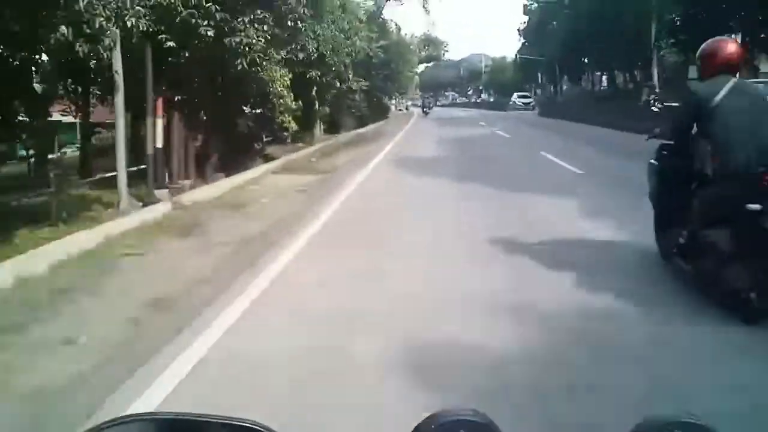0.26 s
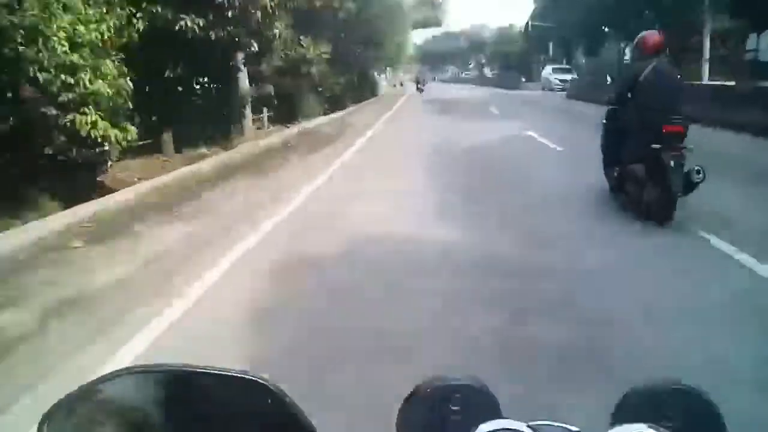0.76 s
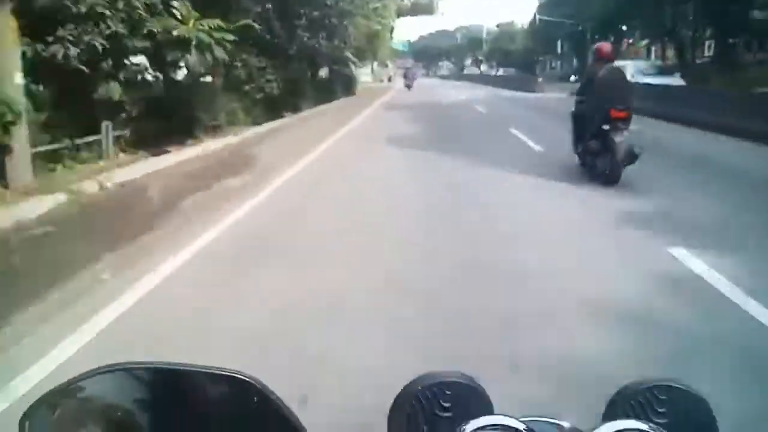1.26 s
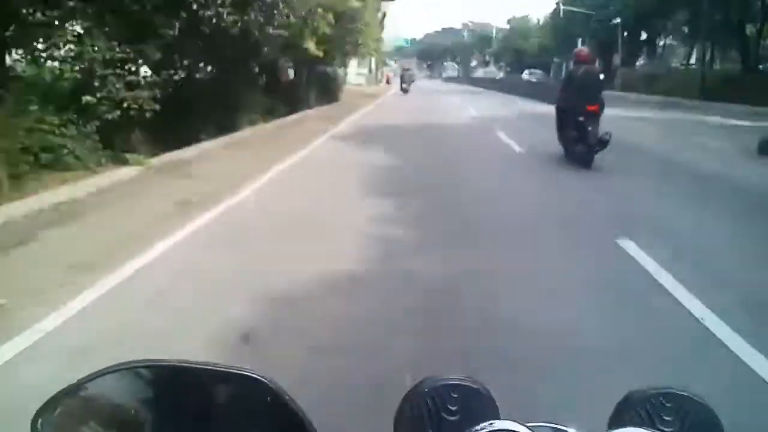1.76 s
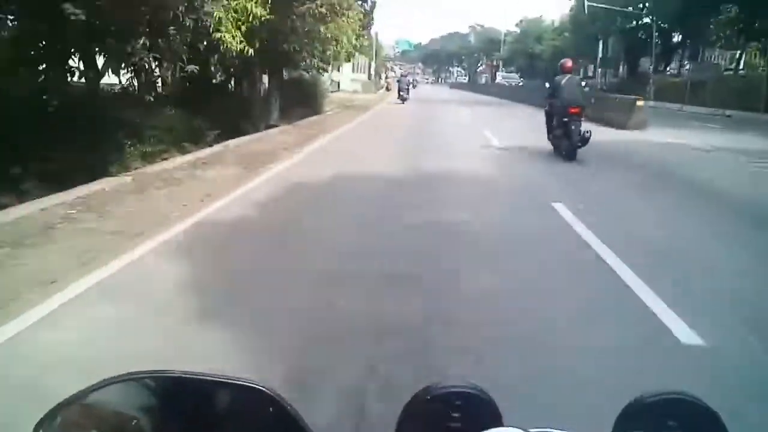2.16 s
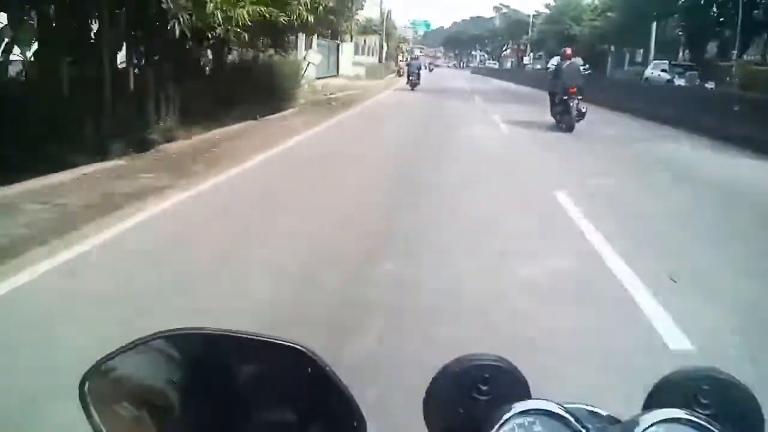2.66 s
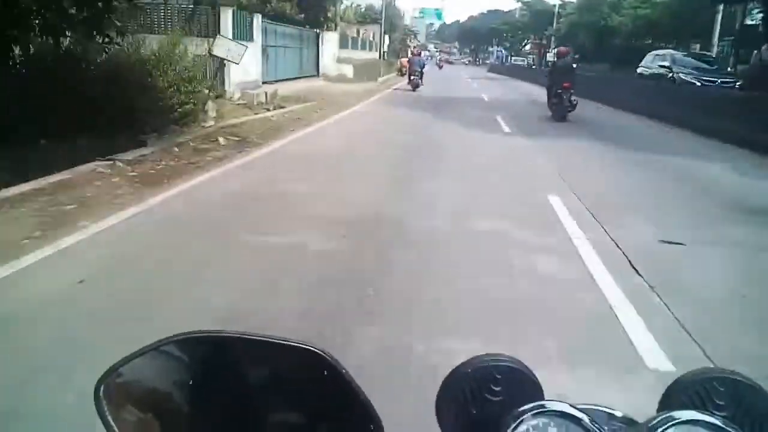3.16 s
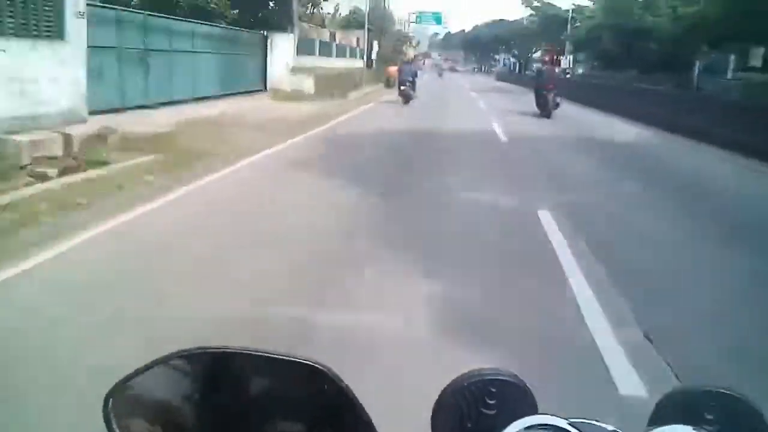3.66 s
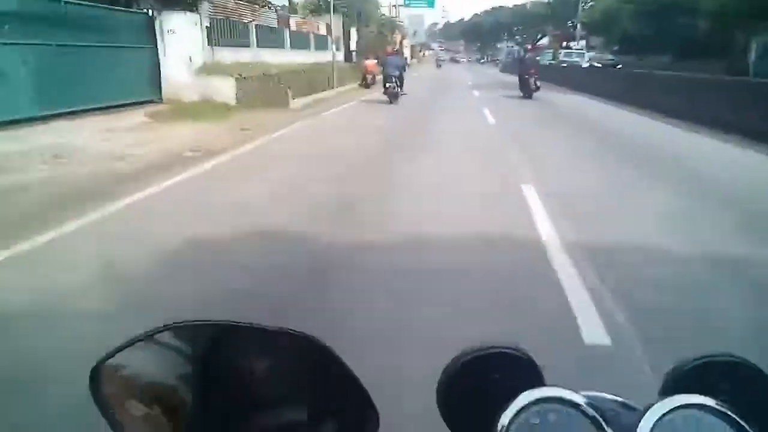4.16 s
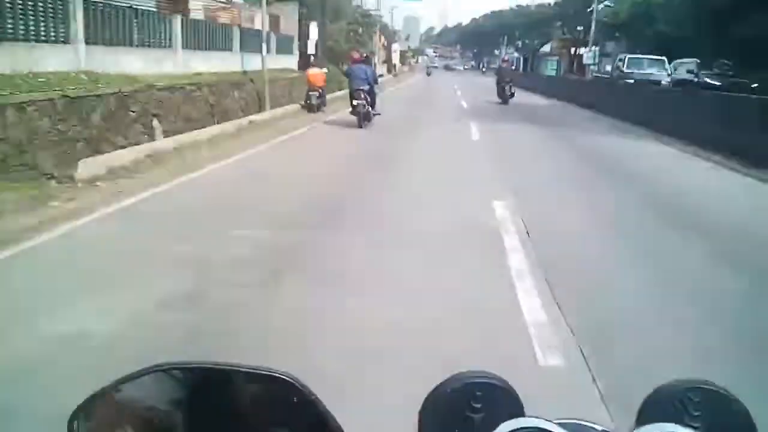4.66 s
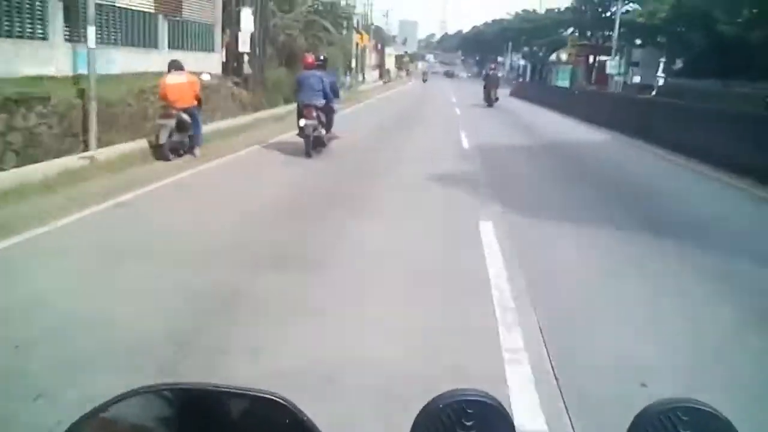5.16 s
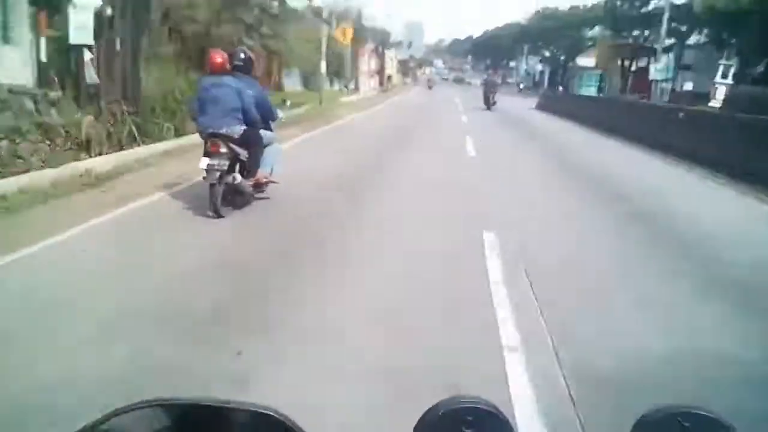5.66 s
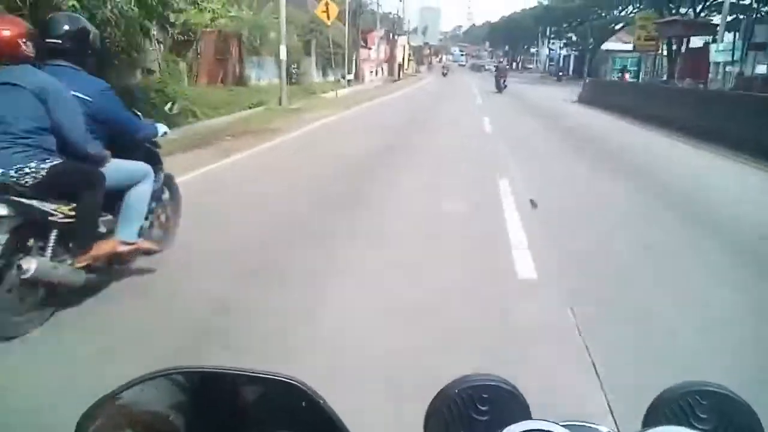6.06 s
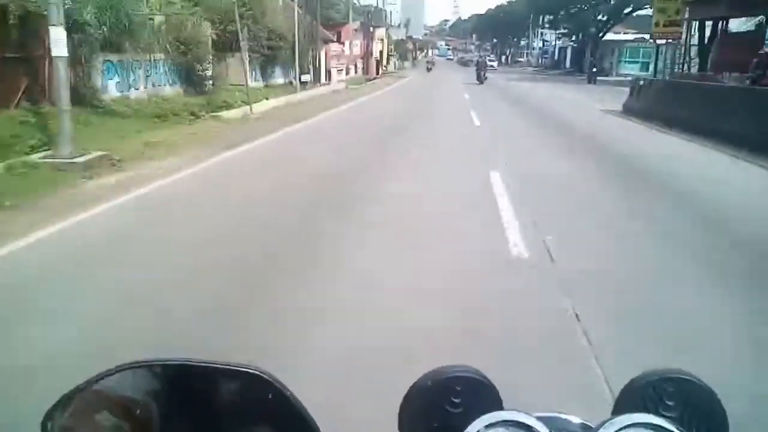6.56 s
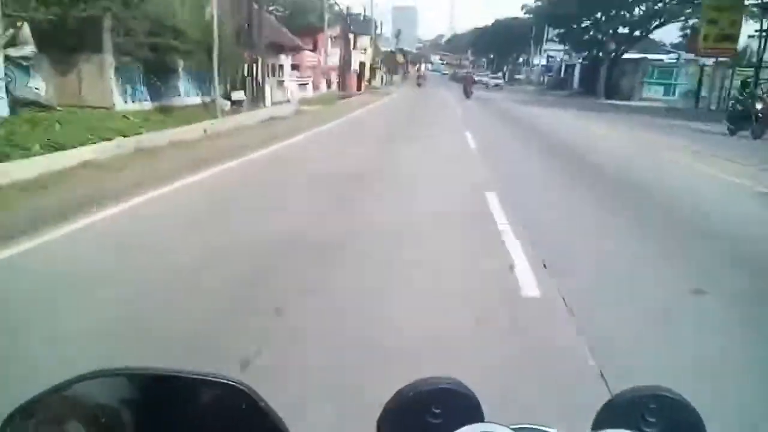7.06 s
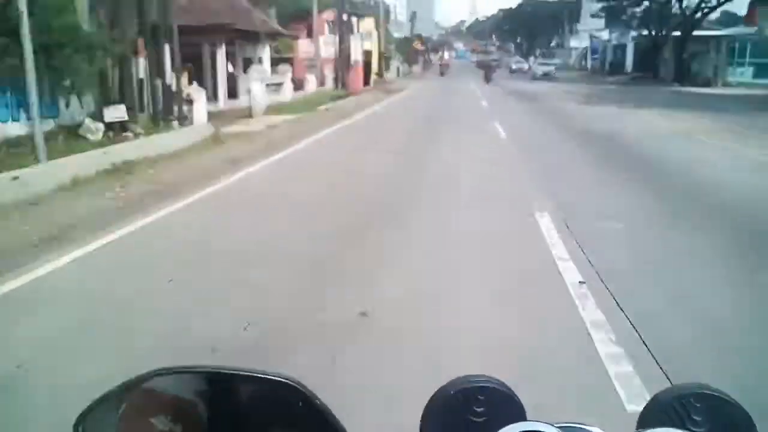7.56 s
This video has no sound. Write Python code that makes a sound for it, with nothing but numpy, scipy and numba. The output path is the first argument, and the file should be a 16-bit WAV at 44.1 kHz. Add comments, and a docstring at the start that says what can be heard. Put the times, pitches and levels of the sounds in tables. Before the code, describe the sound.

Rough, lumpy wind noise with short thumps and hiss dominates a motorcycle ride, the engine humming low and nearly constant beneath it.

```python
"""On a concrete road, a motorcycle cruises with a camera aboard, heard through the camera's muffled microphone.
Turbulent air is shaped noise: a low rumble with gusts and gaps, finer rush and hiss, and short buffets.
Underneath, a single-cylinder engine drones in harmonics and clatters in resonances at nearly steady revs.
The housing ticks now and then and dry specks crackle; a limiter ducks the highest peaks over faint hiss."""
import sys
import numpy as np
from scipy import signal
from scipy.fft import rfft, irfft, next_fast_len
from scipy.io import wavfile
from scipy.ndimage import uniform_filter1d, minimum_filter1d, map_coordinates
from numba import njit

SR = 44100
rng = np.random.default_rng(int(sys.argv[2]) if len(sys.argv) > 2 else 0)


def to_wav(sig):
    """Store sig (one row per channel, or 1-D mono) as 16-bit WAV at the path in sys.argv[1].

    Samples outside -1..1 are clipped; the rate is SR.
    """
    pcm = np.clip(np.atleast_2d(sig), -1, 1) * 32767
    pcm = np.round(pcm).astype(np.int16)
    wavfile.write(sys.argv[1], SR, pcm.T)  # frames by channels


N = 343539


def undb(db):
    """Logarithmic level: decibels become an amplitude ratio."""
    return 10 ** (np.asarray(db) / 20)


def unit(x):
    """Normalisation to an rms of 1."""
    return x / np.sqrt(np.mean(x ** 2))


def curves(table):
    """Linear interpolation: each column of a timed table gets one value per sample."""
    s, *columns = np.transpose(table)
    return [np.interp(np.arange(N) / SR, s, c) for c in columns]


def colour(x, points, size=8192):
    """Minimum-phase filtering: a folded cepstrum makes the (f/Hz, level/dB) response causal."""
    hz, db = np.transpose(points)
    grid = np.maximum(np.arange(size // 2 + 1) * SR / size, 1)
    response_db = np.interp(np.log(grid), np.log(hz), db)
    cepstrum = irfft(np.log(undb(response_db)))
    cepstrum[1:size // 2] *= 2
    cepstrum[size // 2 + 1:] = 0
    impulse_response = irfft(np.exp(rfft(cepstrum)))
    return signal.fftconvolve(x, impulse_response)[:len(x)]


def walk(hz, size=64):
    """Low-passed random fluctuation of rms 1, with a Gaussian roll-off at about hz."""
    steps = next_fast_len(N // size + 2)
    f = np.fft.rfftfreq(steps, size / SR)
    slow = irfft(rfft(rng.standard_normal(steps)) * np.exp(-(f / hz) ** 2), steps)
    return unit(np.interp(np.arange(N) / size, np.arange(steps), slow))


def even(x, span_s):
    """Envelope normalisation: the running rms is held near 1, faster flutter remains."""
    width = max(int(span_s * SR), 2)
    power = uniform_filter1d(uniform_filter1d(x ** 2, width), width)
    return x / np.sqrt(power + 1e-12)


def add(out, s, sound):
    """Superposition: mix a sound in at time s."""
    start = max(int(s * SR), 0)
    out[start:start + len(sound)] += sound[:N - start]


# headwind, large eddies: t/s, relative rumble level/dB
HEADWIND = [(0.0, -27), (0.39, -16.5), (0.56, -21), (2.39, -21.5), (2.75, -18.5), (3.36, -14.5),
            (3.54, -18), (3.95, -19), (4.62, -20.5), (5.84, -18.5), (6.4, -17.5), (6.88, -13), (7.2, -20.5),
            (7.79, -11.5)]
# headwind, small eddies: t/s, relative rush level/dB, relative hiss level/dB
FINE_TURBULENCE = [(0.0, -23.5, -25), (0.07, -20.5, -26), (0.1, -30, -34.5), (0.24, -23, -28),
                   (0.46, -22.5, -28.5), (0.6, -27.5, -33), (0.9, -27, -31), (1.28, -26, -32.5),
                   (1.55, -28, -35), (1.93, -29, -36), (2.2, -26.5, -29.5), (2.45, -28, -36),
                   (2.65, -33, -32.5), (2.8, -28.5, -37.5), (3.05, -25, -34.5), (3.3, -27, -33),
                   (3.6, -23.5, -33), (3.76, -26, -31.5), (3.95, -29, -36.5), (4.18, -24.5, -32),
                   (4.45, -27, -32.5), (4.71, -28.5, -37), (4.85, -28, -32), (5.15, -29, -36),
                   (5.38, -22, -30.5), (5.58, -28, -39), (5.75, -29.5, -34.5), (6.05, -28, -35),
                   (6.25, -25.5, -32), (6.46, -25, -30), (6.62, -27.5, -30), (6.8, -19.5, -26),
                   (6.97, -25.5, -30.5), (7.12, -22.5, -32), (7.26, -27.5, -33.5), (7.33, -24, -30),
                   (7.42, -23, -31), (7.56, -23, -29), (7.65, -26, -34), (7.79, -26, -32.5)]
# nominal size of the eddies, given as a pitch: t/s, f/Hz
EDDY_PITCH = [(0, 115.5), (1.7, 113.5), (3.1, 95.94), (4.4, 106.8), (5.3, 122.2), (6.1, 107.2),
              (7.79, 112.3)]
# spectral shapes of large, small and finest eddies: f/Hz, relative density level/dB per Hz
RUMBLE_SPECTRUM = [(20, -30), (38, -24), (50, -15), (64, -11), (80, 0.5), (100, 4.5), (130, 1), (170, -2.5),
                   (240, -8.5), (330, -14.5), (500, -32.5), (1000, -63)]
RUSH_SPECTRUM = [(100, -9), (200, -4.5), (320, 2.5), (500, -1.5), (750, -6.5), (1100, -11.5), (1600, -17.5),
                 (2600, -27.5), (4000, -45)]
HISS_SPECTRUM = [(400, -26.5), (900, -3), (1300, -1), (2000, -2), (2700, -4), (3150, -6.5), (3400, -9),
                 (4000, -16.5), (6000, -15.5)]


def airflow(rumble_db=0.5, gust_db=-1.5, rush_db=0, hiss_db=-1.0, gust_rush_db=-16, suction_db=3.0,
            lump_db=1.24, surge_db=1.4, rush_flutter_db=2.5, hiss_flutter_db=1.5, usual_eddy_hz=112,
            glide=.7, waver=.02, rush_patchy_db=2.5, hiss_patchy_db=2.7):
    """Turbulence: large eddies rumble, lower when bigger; small ones ride on them and tear loose in suction."""
    large_db, = curves(HEADWIND)
    small_db, fine_db = curves(FINE_TURBULENCE)
    eddy_hz, = curves(EDDY_PITCH)
    gust, lumps, flutter = gusts(), walk(21), walk(28)

    # reading the noise faster or slower shifts its pitch
    pace = (eddy_hz / usual_eddy_hz) ** glide * np.exp(waver * walk(14.01))
    steady_eddies = colour(rng.standard_normal(N), RUMBLE_SPECTRUM)
    eddies = map_coordinates(steady_eddies, [np.cumsum(pace)], order=3, mode="mirror")
    pressure = even(eddies, span_s=0.05)

    rush_gain = undb(rush_flutter_db * flutter - suction_db * pressure)
    rush = colour(rng.standard_normal(N) * rush_gain, RUSH_SPECTRUM)
    hiss = colour(rng.standard_normal(N) * undb(hiss_flutter_db * flutter), HISS_SPECTRUM)
    rush = even(patchy(rush, rush_patchy_db), span_s=0.036)
    hiss = even(patchy(hiss, hiss_patchy_db), span_s=0.35)

    # headwind and gusts add in power
    rumble_level = np.hypot(undb(large_db + rumble_db), gust * undb(gust_db))
    rush_level = np.hypot(undb(small_db + rush_db + surge_db * lumps), gust * undb(gust_rush_db))
    gaps = lulls()
    rumble = pressure * gaps * rumble_level * undb(lump_db * lumps)
    # the gaps cut the rumble most and the hiss least
    rush = rush * rush_level * gaps ** 0.76
    hiss = hiss * undb(fine_db + hiss_db) * gaps ** .15
    return rumble + stall() * (rush + hiss)


# gusts, timed where the edges pass half height: start t/s, length t/s, relative level/dB
GUST_EVENTS = [(0.012, 0.07, -14), (0.174, 0.028, -7.5), (0.26, 0.03, -17), (0.423, 0.14, -17),
               (0.712, 0.023, -11), (0.89, 0.087, -13), (1.225, 0.07, -15.5), (1.812, 0.043, -16),
               (2.206, 0.16, -14), (2.523, 0.54, -13.5), (2.673, 0.15, -12), (3.108, 0.33, -12),
               (3.749, 0.074, -10.5), (3.852, 0.047, -12.5), (3.936, 0.18, -13), (4.222, 0.11, -14.5),
               (4.854, 0.08, -16.5), (5.056, 0.088, -13), (5.363, 0.046, -9.5), (5.524, 0.051, -10),
               (5.601, 0.28, -12.5), (5.896, 0.077, -9.5), (6.055, 0.12, -9.5), (6.322, 0.061, -10),
               (6.633, 0.34, -24), (6.909, 0.1, -11), (7.602, 0.034, -14.5), (7.705, 0.16, -19)]


def gusts(attack_s=0.025, release_s=0.032):
    """Power summation of gust pressures: each swells, holds and dies away linearly."""
    t, power = np.arange(N) / SR, np.zeros(N)
    for s, length_s, db in GUST_EVENTS:
        swell = np.clip(.5 + (t - s) / attack_s, 0, 1)
        fade = np.clip(.5 + (s + length_s - t) / release_s, 0, 1)
        power += (swell * fade * undb(db)) ** 2
    return np.sqrt(power)


# gaps between the lumps of air: centre t/s, half length t/s (to 1/e of the depth), depth level/dB
RUMBLE_GAPS = [(0.1, 0.0088, -2), (0.385, 0.023, -5), (0.7, 0.06, -7), (1.02, .015, -2),
               (1.752, 0.042, -10), (2.4, 0.03, -0.5), (3.07, 0.022, -4.5), (3.6, .025, -6),
               (3.84, 0.016, -8), (4.535, .014, -12), (4.623, 0.0076, -12), (4.67, .012, -5),
               (4.97, .018, -3.5), (5.435, 0.011, -13), (5.875, 0.014, -3), (6.58, .018, -5),
               (7.145, 0.018, -3.5), (7.674, 0.016, -5.5)]


def lulls():
    """Amplitude modulation: Gaussian dips in level make the gaps."""
    t, gap_db = np.arange(N) / SR, np.zeros(N)
    for s, half_s, db in RUMBLE_GAPS:
        gap_db += db * np.exp(-((t - s) / half_s) ** 2)
    return undb(gap_db)


def patchy(x, depth_db, size=1024, count=4):
    """Spectral modulation: narrow stretches of a noise swell and sink as eddies pass."""
    bands = signal.stft(x, nperseg=size)[2]
    patches = rng.standard_normal(bands.shape)
    for axis in (0, 1):
        patches = uniform_filter1d(patches, count, axis=axis)
    return signal.istft(bands * undb(depth_db * unit(patches)))[1][:N]


def stall(depth_db=-2.5, lead_s=0.019, lag_s=0.037):
    """Flow separation: the fine turbulence sinks just before each buffet and recovers after it."""
    t, depth = np.arange(N) / SR, np.zeros(N)
    for s, *_ in EDDY_BUFFETS:
        side_s = np.where(t < s, lead_s, lag_s)
        depth = np.maximum(depth, np.exp(-((t - s) / side_s) ** 2))
    return undb(depth_db * depth)


# eddies that hit the microphone: t/s, relative thump level/dB, relative slap level/dB,
# relative tearing level/dB, length t/s, lag of the jolt t/s (its sign is ignored)
EDDY_BUFFETS = [(0.1075, -11, -8, -18, .016, 0.0063), (0.166, -1.5, -12.5, -11.5, 0.0032, 0.00096),
                (0.29, -8, -11.5, -23, .0055, 0.0021), (0.388, -31, -23, -20, 0.021, 0.0037),
                (0.494, -7.5, -14.5, -17.5, 0.013, 0.0078), (0.543, -24, -8, -16, 0.0048, 0.003),
                (0.98, -7, -8, -16.5, 0.0046, 0.0031), (1.042, -8.5, -12, -22.5, 0.022, 0.011),
                (1.129, -9, -15.5, -23, .02, .0035), (1.391, -13, -10.5, -18.5, 0.021, 0.018),
                (1.455, -13, -11.5, -18.5, 0.0073, .0024), (1.477, -12, -18.5, -27.5, .011, 0.0089),
                (1.648, -8, -14.5, -22, 0.014, 0.0043), (1.701, -13, -11.5, -20, .012, 0.0051),
                (1.883, -1, -17, -24, 0.0089, 0.0056), (2.25, -12.5, -20, -24.5, 0.022, .012),
                (2.282, -4, -12, -21, 0.014, 0.0049), (2.623, -9, -18, -21, 0.0063, 0.003),
                (3.323, -14, -18.5, -25.5, 0.01, 0.0027), (3.357, -15, -16.5, -30, 0.0067, 0.0039),
                (3.389, -0.5, -20, -33, 0.0052, 0.0033), (3.688, -10, -15.5, -21, 0.026, 0.0088),
                (4.06, -5.5, -10, -19, 0.01, .011), (4.26, -11, -13.5, -30, 0.0048, .004),
                (4.294, -14, -20, -29, .024, .013), (4.546, -6, -11.5, -22, 0.008, 0.0028),
                (4.574, -9, -17, -21, 0.012, 0.0054), (4.62, -6.5, -13.5, -21, 0.0097, 0.0023),
                (4.989, -5, -17, -30, 0.0058, 0.0027), (5.025, -13.5, -9, -20, 0.0071, 0.0023),
                (5.034, -16.5, -14.5, -21, 0.016, .002), (5.239, -8.5, -16, -28.5, 0.011, 0.0039),
                (5.291, -28, -16.5, -27, .024, 0.01), (5.381, -11.5, -19.5, -26, 0.021, .017),
                (5.45, -8.5, -11.5, -21, 0.0092, 0.0023), (5.474, -15, -14, -21.5, 0.018, .012),
                (5.518, -11, -17, -27, 0.0094, 0.0029), (6.124, -16, -17.5, -39, 0.013, 0.01),
                (6.434, -7, -14.5, -30.5, .017, 0.0032), (6.743, -27, -26, -23, 0.0084, 0.0027),
                (6.763, -10, -15.5, -27.5, 0.019, 0.007), (6.944, -13.5, -19, -22, 0.027, 0.0018),
                (7.064, -14.5, -8.5, -21.5, 0.0053, 0.004), (7.204, -29, -17.5, -27.5, 0.022, 0.006),
                (7.352, -9.5, -10.5, -18, .017, .009)]
# spectral shapes of the three parts: f/Hz, relative density level/dB per Hz
THUMP_SPECTRUM = [(20, -48), (50, -19), (80, -2.5), (130, 0), (220, -4), (330, -14), (700, -51)]
SLAP_SPECTRUM = [(80, -19), (200, 10.5), (350, 6.5), (600, -4.5), (1000, -6.5), (1800, -27.5),
                 (4000, -52.5)]
TEAR_SPECTRUM = [(400, -23), (900, 19.5), (1500, 4.5), (2500, 0), (3200, -5.5), (4200, -16), (6000, -49.5)]


def buffets(thump_db=0, slap_db=0.5, tear_db=0, attack_s=0.0008, slap_span_s=.005, tear_span_s=0.003,
            slap_jolt=.9, tear_jolt=0.69, jolt_length_s=.0058, jolt_slope=0.88, size=4096):
    """Impulsive excitation: an eddy bursts on the port, a dense noise spurt with one steep jolt of pressure."""
    out, t = np.zeros(N), np.arange(size) / SR
    for s, low_db, mid_db, high_db, length_s, lag_s in EDDY_BUFFETS:
        envelope = (1 - np.exp(-t / attack_s)) * np.exp(-(t / length_s) ** 2)
        noise = rng.standard_normal(2 * size)
        jolt = 1. * (np.arange(size) == int(abs(lag_s) * SR))
        # the shorter the buffet, the more of it is jolt
        strength = (jolt_length_s / length_s) ** jolt_slope
        spread = np.sqrt(length_s * SR / size)  # refers the rms to the spurt's length

        thump = colour(unit(noise[size:] * envelope) + strength * unit(jolt), THUMP_SPECTRUM)
        add(out, s, unit(thump) * spread * undb(low_db + thump_db))
        parts = ((SLAP_SPECTRUM, mid_db + slap_db, slap_span_s, slap_jolt),
                 (TEAR_SPECTRUM, high_db + tear_db, tear_span_s, tear_jolt))
        for shape, db, span_s, share in parts:
            spurt = even(colour(noise, shape), span_s)[size:] * envelope
            burst = unit(spurt) + share * strength * unit(colour(jolt, shape))
            add(out, s, unit(burst) * spread * undb(db))
    return out


# mean engine speed: t/s, firing rate f/Hz
FIRING_RATE = [(0, 54.0), (1.5, 54.3), (2.4, 54.2), (3.6, 54.4), (4.2, 54.6), (4.8, 54.5), (5.5, 54.8),
               (6.6, 54.8), (7.79, 55.0)]
# exhaust harmonics: multiple of the firing rate, relative rms level/dB
DRONE_HARMONICS = [(2, -28), (3, -30.5), (4, -35), (5, -35), (6, -36), (8, -45.5), (9, -49), (11, -45.5),
                   (12, -44.5), (14, -52.5), (15, -45.5), (16, -45), (17, -51), (20, -45), (22, -50)]
# resonances of the engine's metal: f/Hz, bandwidth f/Hz, relative level/dB
CASING_RINGS = [(1118, 100, 14), (1840, 150, 5.5), (2340, 110, 5), (3005, 78, 9.5), (3120, 52, 5),
                (3550, 30, 4), (3920, 39, 1.5)]


def engine(drone_db=0, clatter_db=-42.0, sharpness=1.6, repeat=0.61, waver_db=1.8, ring_waver_db=3,
           waver_hz=5, size=812):
    """Harmonic series and forced resonance: exhaust drones; piston and valves rattle the casing twice a cycle."""
    firing_hz, = curves(FIRING_RATE)
    cycles = np.cumsum(firing_hz * (1 + 0.0016 * walk(5.37))) / SR
    phase = 2 * np.pi * cycles
    drone = np.zeros(N)
    for multiple, db in DRONE_HARMONICS:
        level = undb(db + waver_db * walk(waver_hz))
        start_phase = rng.uniform(0, 2 * np.pi)
        drone += level * np.sqrt(2) * np.sin(round(multiple) * phase + start_phase)

    # part of the rattle is the same in every cycle, the rest is chance
    pattern = np.interp(cycles, np.arange(size) / size, rng.standard_normal(size), period=1)
    # two pulses per cycle: one on each of two crank turns
    pulses = np.exp(sharpness * np.cos(2 * phase))
    knocks = (repeat * pattern + rng.standard_normal(N)) * pulses
    clatter = np.zeros(N)
    for hz, width, db in CASING_RINGS:
        b, a = signal.iirpeak(hz, hz / width, fs=SR)
        level = undb(db + ring_waver_db * walk(waver_hz))
        clatter += level * signal.lfilter(b, a, knocks)
    return drone * undb(drone_db) + unit(clatter) * undb(clatter_db)


# housing ticks: t/s, relative edge peak level/dB, relative body peak level/dB, decay t/s (before filtering)
HOUSING_TICKS = [(1.4474, -35, -31, .0006), (1.879, -37, -19.5, .0005), (4.4495, -38, -16.5, 0.00052),
                 (5.106, -43, -31, .0007), (5.705, -40, -31, 0.00078), (6.826, -28, -26.5, .0005),
                 (7.22, -44, -51, .0006)]
# spectral shapes of the two paths: f/Hz, relative density level/dB per Hz
TICK_BODY_SPECTRUM = [(500, -27), (1200, -14), (2000, -9), (2700, 0.5), (3700, -7), (5200, -3),
                      (8000, -19.5)]
TICK_EDGE_SPECTRUM = [(3000, -3.5), (5000, -11.5), (7000, -1), (10000, 4.5), (12000, -5.5), (15000, -15.5)]


def ticks(body_db=13, edge_db=1, size=1024):
    """Two-path transmission: a snap's dull body comes through air, its thin edge directly to the capsule."""
    body, edge, t = np.zeros(N), np.zeros(N), np.arange(size) / SR
    for s, peak_db, low_db, decay_s in HOUSING_TICKS:
        snap = rng.standard_normal(size) * np.exp(-t / decay_s)
        paths = ((body, TICK_BODY_SPECTRUM, low_db + body_db),
                 (edge, TICK_EDGE_SPECTRUM, peak_db + edge_db))
        for out, shape, db in paths:
            click = colour(snap, shape)
            add(out, s, click / np.abs(click).max() * undb(db))
    return body, edge


# the clearest dry specks: t/s, relative impulse level/dB
CLEAR_SPECKS = [(0.401, -40), (0.7243, -41), (1.059, -43), (1.3553, -42), (1.517, -49), (1.9818, -42),
                (2.147, -43), (3.1123, -47), (3.177, -45), (3.3997, -47), (3.5503, -44), (3.711, -39),
                (3.7499, -44), (3.8227, -48), (4.1091, -45), (4.225, -49), (4.7606, -47), (6.317, -44),
                (6.355, -39), (7.108, -47), (7.1715, -43)]
# spectral shape of a speck: f/Hz, relative density level/dB per Hz
CRACKLE_SPECTRUM = [(2500, -14.5), (4000, 5.5), (5000, 1), (7000, -13), (8500, -32.5)]


def crackle(per_s=30, level_db=-42, spread_db=5, clear_db=22, wind_share=.8):
    """Random impulse process: many faint specks that grow with the wind, and a few clear ones."""
    wind_db, = curves(HEADWIND)
    wind_swing_db = wind_db - wind_db.mean()
    size_db = level_db + wind_share * wind_swing_db + spread_db * rng.standard_normal(N)
    specks = (rng.random(N) < per_s / SR) * undb(size_db)
    for s, db in CLEAR_SPECKS:
        add(specks, s, undb([db + clear_db]))
    return colour(specks, CRACKLE_SPECTRUM)


# what the muffled microphone lets through: f/Hz, gain level/dB
MICROPHONE_RESPONSE = [(20, -5), (55, 0), (3800, 1), (4200, -4), (4700, -14.5), (5200, -21), (5800, -29),
                       (8000, -38), (15000, -48)]


def scene():
    """Superposition at one microphone: muffling acts on airborne sound, not on tick edges or specks."""
    tick_body, tick_edge = ticks()
    air = airflow() + buffets() + engine() + tick_body
    return (colour(air, MICROPHONE_RESPONSE) + tick_edge + crackle())[None]


@njit
def follow(x, attack, release):
    """Peak detection: first-order smoothing with separate rise and fall coefficients per sample."""
    out, e = np.empty(len(x)), 0.
    for i in range(len(x)):
        e += (abs(x[i]) - e) * (attack if abs(x[i]) > e else release)
        out[i] = e
    return out


# faint hiss in the top treble: t/s, relative level/dB
TOP_HISS_LEVEL = [(2.9, -78), (3.35, -71.5), (4.0, -78.5), (5.7, -78), (6.6, -72.5), (7.0, -77)]
# self-noise of the electronics: f/Hz, relative density level/dB per Hz
SELF_NOISE_SPECTRUM = [(3000, -6.5), (6500, 7), (7600, -0.5), (9000, 4.5), (11000, 8), (12500, 1),
                       (15000, -5)]


def record(dry, release_s=0.031, hiss_db=1, flicker_db=2.0, ceiling=.96, top_hz=15600, size=32):
    """Gain control and band limiting: a look-ahead limiter, the electronics' faint hiss and a steep top cut."""
    peak = follow(dry[0], 1.0, 1 / (release_s * SR))
    gain = ceiling / np.maximum(peak, ceiling)
    # a centred minimum lowers the gain ahead of the peak; averaging rounds its steps
    gain = minimum_filter1d(gain, 2 * size)
    gain = uniform_filter1d(uniform_filter1d(gain, size), size)
    hiss_level_db = curves(TOP_HISS_LEVEL)[0] + hiss_db + flicker_db * walk(12)
    hiss = unit(colour(rng.standard_normal(N), SELF_NOISE_SPECTRUM)) * undb(hiss_level_db)
    # order 8, 0.2 dB ripple, 70 dB stopband attenuation
    top_cut = signal.ellip(8, .2, 70, top_hz, fs=SR, output="sos")
    return signal.sosfilt(top_cut, dry * gain + hiss)


dry = scene()
out = record(dry)
to_wav(out)
```